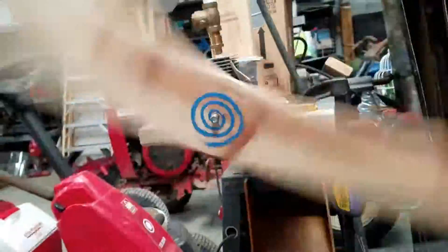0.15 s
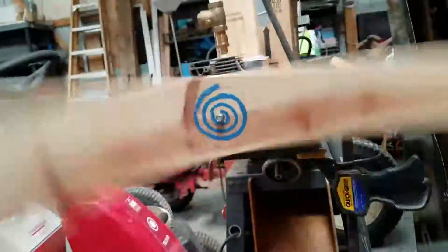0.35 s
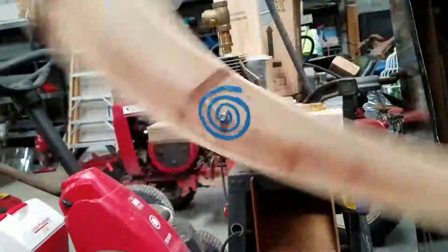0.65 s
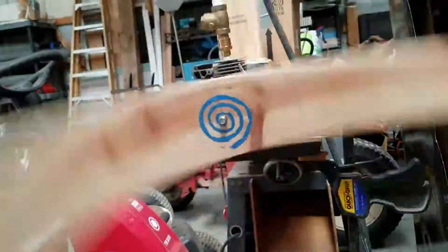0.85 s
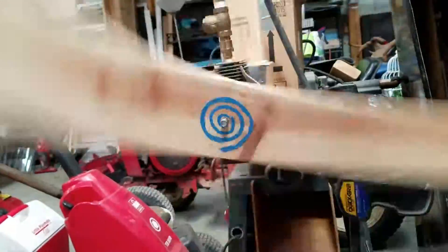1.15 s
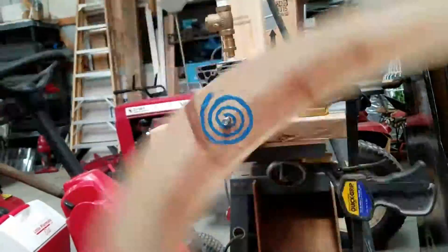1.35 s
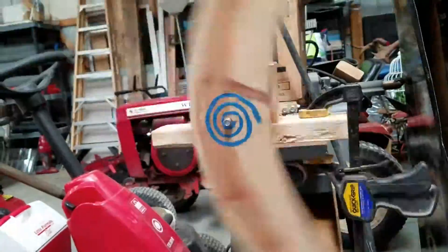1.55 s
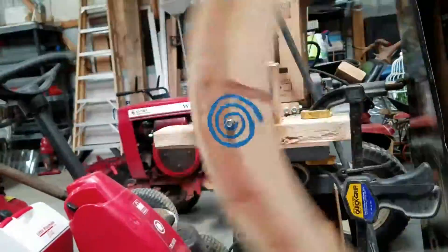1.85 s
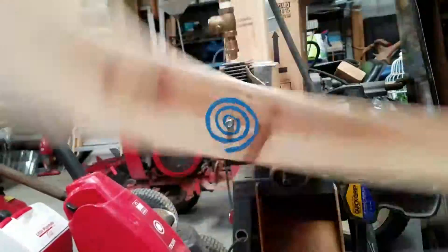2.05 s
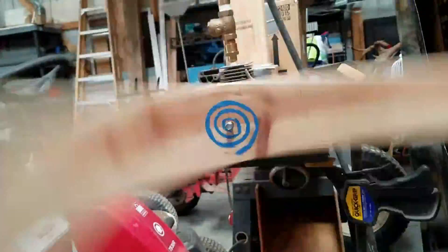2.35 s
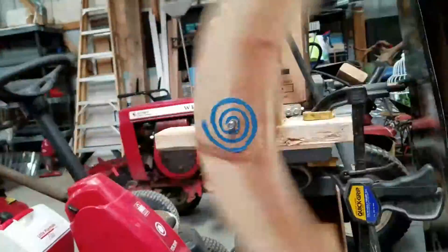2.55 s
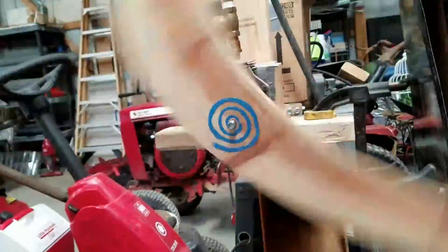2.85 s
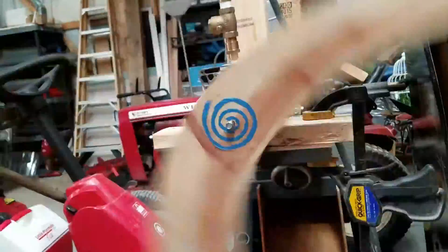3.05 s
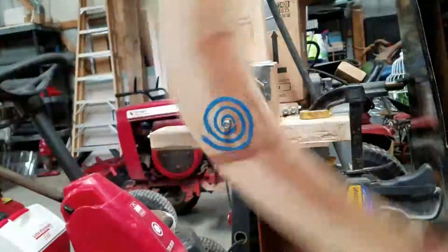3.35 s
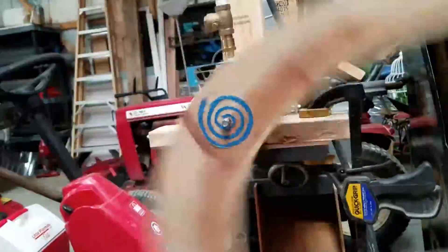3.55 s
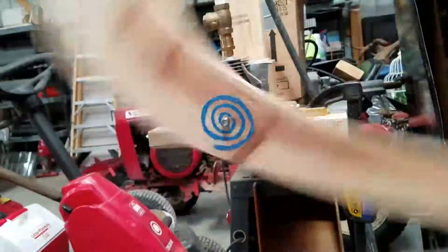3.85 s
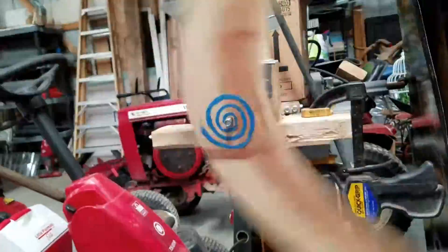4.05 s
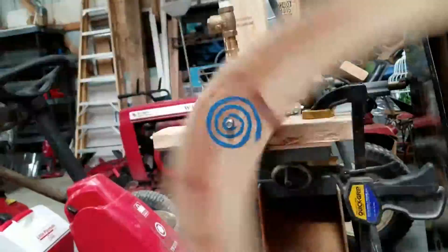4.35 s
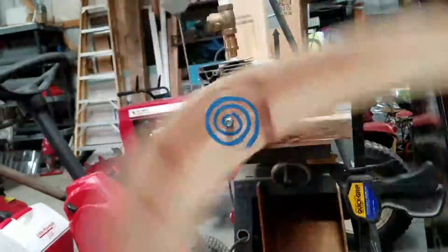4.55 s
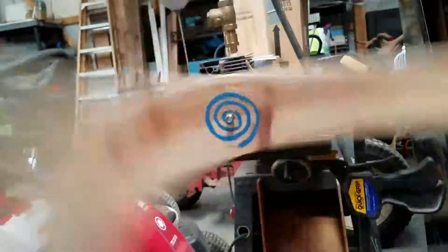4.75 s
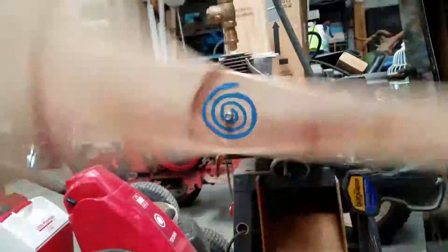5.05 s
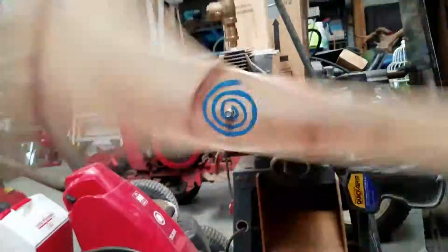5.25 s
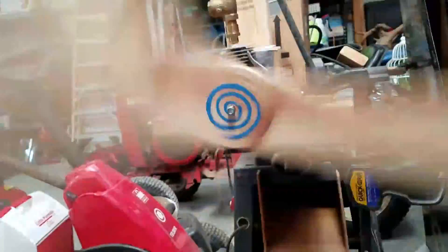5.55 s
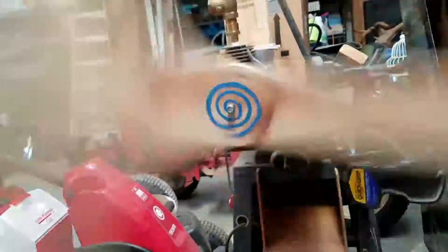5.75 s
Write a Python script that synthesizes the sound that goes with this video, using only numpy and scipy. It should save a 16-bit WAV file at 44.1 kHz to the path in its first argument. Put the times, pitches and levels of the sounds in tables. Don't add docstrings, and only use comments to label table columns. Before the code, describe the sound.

Rhythmic metallic clacks alternate with breathy compressed-air exhaust puffs, quickening from about three to five turns per second, the air finally dominating.

```python
import sys
import numpy as np
from scipy import signal
from scipy.fft import rfft, irfft, next_fast_len
from scipy.io import wavfile
from scipy.ndimage import uniform_filter1d, map_coordinates

SR = 44100
rng = np.random.default_rng(int(sys.argv[2]) if len(sys.argv) > 2 else 0)


def int16_out(signal):
    q = np.round(np.clip(np.atleast_2d(signal).T, -1, 1) * 32767)
    wavfile.write(sys.argv[1], SR, q.astype(np.int16))


def voltage_ratio(level):
    return 10 ** (np.asarray(level, float) / 20)


N = 260190
WIDE_OPEN_S = 3.55

# (time [s], peak level [dB], struck part [Hz], its level [dB])
VALVE_CLACKS = [(0.279, -18, 1585, -3), (0.614, -17.5, 1530, -14), (0.945, -14, 1600, -12),
                (1.265, -14, 1290, -20), (1.573, -14.5, 1530, -10), (1.872, -13, 1530, -29),
                (2.162, -15.5, 1490, -2), (2.443, -12.5, 1260, -22), (2.716, -12, 1302, -22),
                (2.98, -8.5, 1600, -24), (3.237, -9, 1290, 1), (3.486, -10, 1496, -5),
                (3.726, -18.5, 1483, -4), (3.961, -20.5, 1270, -15), (4.187, -19.5, 1500, -5.5),
                (4.406, -24, 1530, -18), (4.622, -23.5, 1496, 1), (4.832, -25, 1475, -1),
                (5.038, -25, 1530, -1), (5.241, -29.5, 1520, -7), (5.441, -22, 1483, 1),
                (5.637, -22.5, 1456, -6), (5.833, -22, 1480, -21)]
# (time [s], hiss level [dB], rise [s], slit whistle [Hz])
PORT_OPENINGS = [(0.0191, -20, 0.0021, 2470), (0.368, -17, 0.0025, 2335), (0.701, -15, 0.001, 2440),
                 (1.035, -16.5, 0.0032, 2560), (1.353, -18, 0.003, 2425), (1.6554, -15.5, 0.022, 3870),
                 (1.951, -14.5, 0.01, 2190), (2.241, -19.5, 0.003, 2200), (2.521, -22, 0.003, 2214),
                 (2.798, -13.5, 0.003, 2370), (3.052, -22, 0.0025, 2855), (3.308, -19.5, 0.003, 2840),
                 (3.556, -17, 0.0023, 3650), (3.799, -18, 0.0064, 2870), (4.031, -17.5, 0.0032, 2730),
                 (4.254, -18.5, 0.0038, 2760), (4.472, -21, 0.0039, 2250), (4.686, -19, 0.0041, 2850),
                 (4.897, -19.5, 0.0022, 2160), (5.101, -20.5, 0.0025, 2160), (5.305, -18, 0.003, 2675),
                 (5.5015, -19.5, 0.0041, 2350), (5.6967, -23, 0.0053, 2640), (5.894, -20, 0.0043, 3720)]
# (time [s], hiss level [dB], port resonance [dB], hold [s])
PORT_SURGES = [(0.042, -16.5, -4, 0.0087), (0.387, -16.5, -11, 0.0086), (0.7205, -16.5, -12, 0.011),
               (1.0485, -14.5, -12, .005), (1.365, -13, -20, .01), (1.669, -16, -5, .01),
               (1.966, -18.5, -11, .015), (2.252, -12.5, -5, 0.014), (2.529, -13.5, -5.5, 0.023),
               (2.804, -16, -17, 0.018), (3.063, -12.5, -9.5, 0.024), (3.317, -12, -2.5, 0.018),
               (3.563, -14, -8, 0.016)]
# (time [s], hiss level [dB], port resonance [dB], level of the flow that follows [dB], hold [s])
PORT_BLASTS = [(1.073, -16.5, -15, -37, .002), (1.394, -19, -12, -39, .002), (1.7, -17.5, -16, -34, .004),
               (1.9994, -26, -5, -44, .004), (2.285, -16.5, -5, -36, .002), (2.561, -15.5, -4, -28.5, .004),
               (2.826, -16.5, -13, -30.5, .002), (3.09, -17, -9, -28.5, .002),
               (3.348, -12, -16, -27.5, .002), (3.594, -7.5, -7.5, -16.5, .003),
               (3.83, -9, -4.5, -31, 0.0068), (4.0634, -8, -18, -19.5, .003),
               (4.285, -9.5, -4.5, -21.5, 0.004), (4.503, -10, -3, -25.5, 0.0034),
               (4.7176, -6, -2.5, -19, 0.0044), (4.925, -8, -10, -14.5, 0.0075),
               (5.131, -5, -6, -14.5, 0.0069), (5.3324, -6, -16, -15, 0.0084),
               (5.5307, -8.5, -9, -14, 0.013), (5.724, -8.5, -12, -20, 0.011)]
# (frequency [Hz], level [dB per Hz])
JET_SPECTRUM = [(290, -11), (500, -9.5), (1380, -7.5), (1550, -3), (1840, -9), (2260, -0.5), (4400, -5),
                (5390, -11), (6800, -7.5), (16000, -3)]


def unit(x):
    return x / np.sqrt(np.mean(x ** 2) + 1e-20)


def along(points, hz):
    f, v = np.transpose(points)
    return np.interp(np.log(hz + 1), np.log(f + 1), v)


def spectrum(points):
    return lambda hz: voltage_ratio(along(points, hz))


def filtered(x, response):
    m = next_fast_len(N + 8192)
    return irfft(rfft(x, m) * response(np.fft.rfftfreq(m, 1 / SR)), m)[..., :N]


def place(track, s, part):
    start_sample = round(s * SR)
    track[..., start_sample:start_sample + part.shape[-1]] += part


def decay(t, t60):
    return voltage_ratio(-60 * np.maximum(t, 0) / t60)


def swell(t, rise, t60, hold=0):
    shape = (1 - np.exp(-t / max(rise, 1e-4))) ** 2 * decay(t - hold, t60)
    return shape / shape.max()


def rush(gain, alike_share):
    # (frequency [Hz], left-right likeness [0-1])
    likeness = [(60, 1), (180, 1), (550, 0.9), (1650, 0.12), (4970, 0.23), (15000, 0.053)]

    def mid_and_side(hz):
        angle = np.arccos(np.clip(alike_share * along(likeness, hz), -1, 1)) / 2
        return gain(hz) * np.array([np.cos(angle), np.sin(angle)])

    mid, side = filtered(rng.standard_normal((2, N)), mid_and_side)
    return unit(np.array([mid + side, mid - side]))


def patchy(x, depth_db):
    z = signal.stft(x, nperseg=256)[2]
    field = uniform_filter1d(rng.standard_normal(z.shape[1:]), size=5, axis=0)
    field = uniform_filter1d(field, size=5, axis=1)
    return unit(signal.istft(z * voltage_ratio(depth_db * unit(field)), nperseg=256)[1][:, :N])


def shed_tail():
    # (frequency [Hz], t60 [s])
    shed_t60 = [(200, 0.31), (1000, 0.6), (4000, 0.4), (12000, 0.33)]
    hz, t, (a, b) = signal.stft(rng.standard_normal((2, SR // 3)), SR, nperseg=256)
    alike = 1 / (1 + (hz[:, None] / 700) ** 2)
    z = np.array([a, alike * a + np.sqrt(1 - alike ** 2) * b])
    tail = signal.istft(z * voltage_ratio(-60 * t / along(shed_t60, hz)[:, None]), SR, nperseg=256)[1]
    return np.pad(tail / np.linalg.norm(tail[0]), ((0, 0), (200, 0)))


def in_shed(x):
    return signal.fftconvolve(x, shed_tail(), axes=1)


def ring(modes, t, attack, hold, scatter_db, spread):
    hz, db, t60 = np.transpose(modes)[:, :, None]
    chance = rng.standard_normal((3, len(modes), 1))
    fade = voltage_ratio(db + scatter_db * chance[0]) * decay(t - hold, t60) * (1 - np.exp(-t / attack))
    phase = 2 * np.pi * hz * (1 + 0.004 * chance[1]) * t
    lead = spread * chance[2] * hz / 1000
    return np.array([(fade * np.sin(phase + side * lead)).sum(0) for side in (-.5, .5)])


def clatter(points, t, hold, t60):
    hz = np.fft.rfftfreq(len(t), 1 / SR)
    shared, left, right = rng.standard_normal((3, len(t)))
    z = rfft([0.7 * shared + 0.82 * left, 0.72 * shared + 0.83 * right]) * voltage_ratio(along(points, hz))
    high = 1 / (1 + (3500 / (hz + 1)) ** 4)
    size = np.std(irfft(z, len(t)))
    low_part = irfft(z * (1 - high), len(t)) * decay(t - hold, t60)
    first_crack = voltage_ratio(-3.5) * decay(t, 0.0078)
    high_part = irfft(z * high, len(t)) * (decay(t - 0.77 * hold, 0.41 * t60) + first_crack)
    return (low_part + high_part) / size * (1 - np.exp(-t / 0.00063))


def blows(events, body, bright, trim_db, hold, clatter_db, clatter_t60, wet_db, scatter_db, struck_t60):
    # (frequency [Hz], level [dB], t60 [s])
    board = [(88, 0, 0.14), (122, 3.5, 0.021), (162, 2, 0.073)]
    ringing_to_walls = 0.55
    out, t = np.zeros((2, N + SR)), np.arange(SR // 5) / SR
    for s, db, bright_db, thump_db, part_hz, part_db in events:
        metal = ring(body + [(part_hz, part_db, struck_t60)], t, 0.0011, hold, scatter_db, 0.99)
        rattle = voltage_ratio(bright_db + clatter_db) * clatter(bright, t, hold, clatter_t60)
        thump = voltage_ratio(thump_db + 3.0) * ring(board, t, 0.00061, 0, 3.0, 0.71)
        hit = voltage_ratio(wet_db) * in_shed(ringing_to_walls * metal + rattle + thump)
        hit[:, :len(t)] += metal + rattle + thump
        place(out, s, voltage_ratio(db + trim_db) * hit)
    return out[:, :N]


def cushion(s):
    return -5.5 * (s > WIDE_OPEN_S)


def wash():
    # (time [s], rumble level [dB], hose hiss level [dB])
    background = [(0.0, -44, -53), (0.71, -48.5, -56.5), (1.64, -47, -46.5), (2.86, -44.5, -48),
                  (3.5, -41.5, -39.5), (3.81, -48.5, -41.5), (4.5, -50.5, -39), (5.39, -48.5, -33),
                  (5.9, -51, -42)]
    # (frequency [Hz], level [dB per Hz])
    hum = [(15, -55), (25, -30), (113, 11), (331, 1), (790, -3.5), (1080, -5.5), (1190, -7), (1560, -9),
           (1840, -16), (2270, -10), (3500, -39), (4550, -40), (7700, -120)]
    # (frequency [Hz], level [dB per Hz])
    hose = [(1500, 2), (3000, 10), (4500, 3), (6000, 3), (9000, 0), (13600, -30), (16000, -9)]
    s, *cols = np.transpose(background)
    rumble_db, hose_db = (np.interp(np.arange(N) / SR, s, col) for col in cols)
    rumble = voltage_ratio(rumble_db + 1.5) * rush(spectrum(hum), 0.94)
    return rumble + voltage_ratio(hose_db - 7.0) * rush(spectrum(hose), 0.51)


def puffs():
    # (time [s], opening [0-1])
    supply = [
        (0, 0.24),
        (2.3, 0.28),
        (3.1, 0.23),
        (3.5, .98),
        (5.9, .9),
    ]
    blast_rise = 0.0018
    openings = []
    for s, db, rise, slit_hz in PORT_OPENINGS:
        t60 = 0.053 + 0.22 * np.interp(s, *np.transpose(supply))
        openings.append((s, db, -4, rise, t60, 0, slit_hz))
    gusts = [(s, db, port_db, 0.0015, 0.15, hold) for s, db, port_db, hold in PORT_SURGES]
    for s, db, port_db, follow_db, hold in PORT_BLASTS:
        gusts.append((s, db, port_db, blast_rise, 0.073, hold))
        gusts.append((s + 0.014, follow_db, -3, blast_rise, 0.31, 0))
    return openings, gusts


def resonances(peaks):
    def gain(f):
        total = 0
        for k, (centre, width_hz, db) in enumerate(peaks):
            peak = f * width_hz / (centre ** 2 - f ** 2 + 1j * f * width_hz)
            total = total + (-1) ** k * voltage_ratio(db) * peak
        return np.abs(total)
    return gain


def exhaust():
    seepage_db = [-5.5, -12, -5, -10, -7, -16, -16, -24, -16, -6, -15, -15, -15, -12, -10, -11, -11, -13,
                  -12, -13, -18, -20, -15, -14]
    # (frequency [Hz], width [Hz], level [dB])
    port_throttled = [(1600, 100, 1.5), (2270, 180, 0.5), (2800, 230, 1), (4180, 600, -2.5)]
    # (frequency [Hz], width [Hz], level [dB])
    port_fed = [(1570, 210, 0.5), (2250, 190, -2), (2680, 70, -1), (2870, 100, 1), (4950, 1800, -3.5)]
    jet_power, port_power, whistle = np.zeros((3, N + SR))
    t = np.arange(SR // 3) / SR
    openings, gusts = puffs()
    for (s, db, port_db, rise, t60, _, slit_hz), seep_db in zip(openings, seepage_db):
        place(jet_power, s - 0.01, voltage_ratio(2 * (db + seep_db)) * swell(t, 0.0039, 0.1) ** 2)
        phase = 2 * np.pi * slit_hz * (0.9 * t + 0.0764 * 0.02106 * (1 - np.exp(-t / 0.0203)))
        overtones = sum(voltage_ratio(-4 * k) * np.sin((k + 1) * phase) for k in range(4))
        place(whistle, s, voltage_ratio(db + port_db) * swell(t, rise, 0.41 * t60) * overtones)
    for s, db, port_db, rise, t60, hold, *_ in openings + gusts:
        gust_power = swell(t, rise, t60, hold) ** 2
        place(jet_power, s - 0.003, voltage_ratio(2 * db) * gust_power)
        place(port_power, s - 0.003, voltage_ratio(2 * (db + port_db)) * gust_power)
    flutter = voltage_ratio(1.4 * map_coordinates(rng.standard_normal(N // 100 + 4), [np.arange(N) / 100]))
    throttled = np.arange(N) / SR < WIDE_OPEN_S
    throat = np.where(throttled, rush(resonances(port_throttled), .95), rush(resonances(port_fed), 0.84))
    hiss = voltage_ratio(-6) * np.sqrt(jet_power[:N]) * patchy(rush(spectrum(JET_SPECTRUM), 0.95), depth_db=2.5)
    hoarse = voltage_ratio(-13.5) * whistle[:N] * rush(lambda hz: 1 / (1 + (hz / 250) ** 2), 0.93)
    resonant = voltage_ratio(-9.0) * np.sqrt(port_power[:N]) * patchy(throat, depth_db=5.0)
    air = flutter * (hiss + hoarse + resonant)
    return air + voltage_ratio(-10.5) * in_shed(air)[:, :N]


def rod():
    # (time [s], peak level [dB], bright part [dB])
    cams = [(0.02, -25.5, -4), (0.363, -23.5, -6), (0.698, -23, -18), (1.026, -26, -8), (1.342, -32, -13.5),
            (1.648, -30, -10), (1.944, -25, -14), (2.232, -22.5, -9), (2.512, -24, -21), (2.782, -22.5, -7),
            (3.043, -31, -6), (3.299, -24, -12), (3.547, -20.5, -11), (3.786, -21.5, -21), (4.017, -24, -9),
            (4.241, -36, -10), (4.46, -35, -10), (4.674, -37, -7), (4.883, -33, 0), (5.088, -29, -10),
            (5.29, -31, -2), (5.489, -32, -8), (5.685, -42, -10), (5.881, -25.5, -10)]
    # (time [s], peak level [dB], bright part [dB])
    knocks = [(0.087, -30.5, 7.5), (0.428, -31.5, 5), (0.761, -30.5, 5), (1.089, -32, 5),
              (1.404, -19.5, -3.5), (1.708, -24.5, -0.5), (2.001, -22, 3.5), (2.287, -18, -4),
              (2.566, -15.5, -11), (2.833, -18, -1), (3.095, -14, -6), (3.349, -15, -10),
              (3.594, -12.5, 1.5), (3.831, -16.5, 3.5), (4.062, -16, 0), (4.285, -20, -4),
              (4.503, -24.5, 2), (4.715, -29, -10), (4.926, -32, -3), (5.136, -19.5, 3), (5.33, -21, 5),
              (5.529, -22, 3), (5.725, -27, 2), (5.917, -25, 1)]
    # (frequency [Hz], level [dB], t60 [s])
    rod_modes = [(615, -8.5, 0.048), (741, -2, 0.031), (813, -3.5, 0.07), (857, -3, 0.082),
                 (1069, -6, 0.025), (1300, -11.5, .03), (2250, -9, 0.083)]
    # (frequency [Hz], level [dB per Hz])
    rod_bright = [(400, -9), (800, -8), (1500, -3), (2300, -5), (2800, -0.5), (4000, -23), (8000, -16.5),
                  (16000, -5.5)]
    events = [(s, db, bright_db, -21.5, 2100, -12) for s, db, bright_db in cams]
    events += [(s, db, bright_db, -34 + cushion(s) - db, 1058, -2) for s, db, bright_db in knocks]
    return blows(events, rod_modes, rod_bright, trim_db=-5.5, hold=0.0028, clatter_db=0.0,
                 clatter_t60=0.11, wet_db=-8, scatter_db=1.5, struck_t60=.03)


def pings():
    # (time [s], peak level [dB], frequency [Hz], t60 [s])
    housing_parts = [(.024, -29.5, 2310, 0.091), (.045, -34, 2500, .03), (.099, -37, 2040, 0.08),
                     (.155, -38, 2310, 0.042), (0.281, -28, 1280, .05), (.368, -33, 4270, .03),
                     (0.385, -27, 2970, .025), (.704, -26, 2380, 0.056), (.829, -40, 2260, 0.047),
                     (1.045, -19, 2335, 0.021), (1.62, -27, 1530, 0.033), (1.671, -16, 3900, .04),
                     (1.678, -33, 2250, 0.055), (2.568, -23, 2800, .03), (3.836, -23, 2470, .04),
                     (4.505, -22, 2800, 0.044), (4.896, -30, 1600, .07), (4.928, -26, 2700, .04),
                     (4.935, -26, 742, 0.15), (4.943, -19, 1517, 0.055), (4.944, -14, 2750, 0.03),
                     (5.135, -28, 2870, 0.051), (5.151, -19, 2870, 0.04), (5.19, -30, 1050, 0.048),
                     (5.35, -17, 2935, 0.061), (5.506, -28, 1630, .06), (5.535, -21, 2740, 0.027),
                     (5.553, -17.5, 2770, 0.053), (5.701, -31, 1630, .06), (5.725, -29.5, 740, .12),
                     (5.73, -27, 2590, .04), (.022, -26, 4200, 0.028), (.388, -31, 6030, .04),
                     (.39, -29, 5000, .02), (.945, -33, 1064, 0.12), (1.026, -33, 860, 0.022),
                     (1.088, -29, 813, 0.023), (1.265, -23.5, 1068, .09), (1.873, -21.5, 1059, 0.074),
                     (1.944, -33, 850, 0.022), (2.512, -31, 860, 0.022), (3.095, -36, 867, .1),
                     (3.299, -31, 850, 0.021), (3.348, -24.5, 858, 0.12), (4.883, -34, 920, .03),
                     (5.089, -30.5, 950, 0.027), (5.29, -36, 870, 0.02)]
    out, t = np.zeros((2, N + SR)), np.arange(SR // 5) / SR
    for s, db, hz, t60 in housing_parts:
        place(out, s, ring([(hz, db, t60)], t, 0.0012, 0.0033, 0, 0.67))
    return out[:, :N] + voltage_ratio(-14.5) * in_shed(out[:, :N])[:, :N]


def crackle():
    flow, t = np.zeros(N + SR), np.arange(SR // 100) / SR
    for s, db, *_ in PORT_SURGES + PORT_BLASTS:
        for late, size in rng.random((6, 2)):
            spit_db = db - 13.5 - 8.6 * late + 8.1 * size
            place(flow, s + 0.04 * late ** 2, voltage_ratio(spit_db) * decay(t, 0.005))
    return flow[:N] * rush(spectrum(JET_SPECTRUM), .9)


def linkage():
    # (time [s], peak level [dB], bright part [dB])
    returns = [(.154, -29.5, -2), (.494, -33.5, 5), (.826, -31, -2), (1.149, -34, 8), (1.462, -33, 5),
               (1.767, -43, 0), (2.058, -31, 1), (2.343, -29.5, -6), (2.62, -27, 6), (2.886, -36, 3),
               (3.14, -29, -10), (3.398, -31, -12)]
    # (time [s], peak level [dB], bright part [dB], struck part
    # [Hz])
    rattles = [(1.299, -30, 3, 2300), (1.614, -28, -7, 1560), (0.31, -44, -4, 1500), (2.195, -33, -8, 1520),
               (3.27, -22.5, -5, 1300), (3.61, -21, 5, 860), (4.945, -21, 1, 1300), (5.144, -30, 19, 860),
               (5.151, -15.5, -9, 1050), (5.157, -21, -15, 1100), (5.344, -21, 8, 850),
               (5.351, -21, 8.5, 950), (5.358, -19, -9, 824), (5.552, -21, 3, 1110), (5.561, -17.5, 2, 840),
               (5.743, -25, -2, 1700),
               (0.295, -35, -10, 1500), (0.631, -37, -5, 1300), (0.963, -30, -3, 1510),
               (1.155, -33, 6.5, 2250), (1.282, -33, -5, 1300), (1.591, -29, -3, 1500),
               (1.887, -30, -4, 1300), (2.179, -35, -5, 1530), (2.468, -31, -11, 1300),
               (2.748, -31, -4, 1300), (2.999, -27, -9, 1470), (3.02, -27, -3, 1300),
               (3.262, -29, -12, 1400), (3.504, -31, -8, 1300), (4.416, -31, -10, 1070),
               (4.509, -20.5, 4, 1600), (4.722, -30, -9, 1570)]
    # (frequency [Hz], level [dB], t60 [s])
    link_modes = [(612, -12.5, 0.081), (740, -6.5, 0.075), (850, -11, 0.1), (1064, 4, 0.027),
                  (1290, -0.5, 0.041), (1850, -9, 0.0079), (2274, -10, 0.042)]
    # (frequency [Hz], level [dB per Hz])
    link_bright = [(400, -2), (800, -15), (1500, 3), (2300, 9), (2800, 5), (4000, -33), (8000, -15),
                   (16000, -10)]
    events = [(s, db, bright_db, -15, 1080, -0.9) for s, db, bright_db in returns]
    events += [(s, db, bright_db, -22, hz, 1.5) for s, db, bright_db, hz in rattles]
    return blows(events, link_modes, link_bright, trim_db=-6.5, hold=0.0017, clatter_db=-2.5,
                 clatter_t60=0.033, wet_db=-5.0, scatter_db=4.5, struck_t60=.024)


def crank(share):
    s = np.array([row[0] for row in VALVE_CLACKS])
    first_turn, last_turn = 0.33, 0.18
    turn_edges = np.concatenate([[s[0] - first_turn], s, [s[-1] + last_turn]])
    return turn_edges[:-1] + share * np.diff(turn_edges)


def inlet():
    # (frequency [Hz], level [dB per Hz])
    leak = [(4000, -45), (8000, -15), (11000, -3), (14000, 6), (16000, -5)]
    flow, t = np.zeros(N + SR), np.arange(SR // 5) / SR
    moments = crank(0.846)
    for s in moments[moments < WIDE_OPEN_S]:
        db = -29 + 0.7 * s
        place(flow, s - 0.004, voltage_ratio(db - 11.5) * swell(t, 0.0057, 0.22, hold=0.026))
    return flow[:N] * rush(spectrum(leak), .8)


def valve():
    # (frequency [Hz], level [dB], t60 [s])
    valve_modes = [(397, -22.5, 0.25), (512, -18, 0.12), (618, -12, 0.098), (869, -14, 0.21),
                   (944, -12, 0.14), (1065, 0, 0.07), (1156, -12.5, 0.092), (1530, -12.5, 0.049)]
    # (frequency [Hz], level [dB per Hz])
    valve_bright = [(350, -24), (600, -5.5), (1000, -7), (1400, -3.5), (1780, -5.5), (2340, -2),
                    (3500, -13.5), (5660, -22), (8430, -28), (12700, -29), (16000, -22.5)]
    events = []
    for s, db, hz, part_db in VALVE_CLACKS:
        bright_db = -6 - 0.29 * (db + 17.0)
        thump_db = -39.5 + cushion(s) - db
        events.append((s, db, bright_db, thump_db, hz, part_db))
    return blows(events, valve_modes, valve_bright, trim_db=-5.0, hold=0.0067, clatter_db=1,
                 clatter_t60=0.048, wet_db=-10.0, scatter_db=1.0, struck_t60=0.051)


def spits():
    spits_db = [-35, -34.5, -32, -35, -40, -26, -33, -37, -40, -40, -52, -33, -36, -42, -38, -42, -48, -46,
                -46, -46, -44, -46, -44]
    # (frequency [Hz], level [dB per Hz])
    spit_spectrum = [(3000, -32), (6000, -8), (9000, -1), (14000, 2), (16000, -2.5)]
    flow, t = np.zeros(N + SR), np.arange(SR // 5) / SR
    for (s, *_), db in zip(VALVE_CLACKS, spits_db):
        place(flow, s, voltage_ratio(db) * swell(t, 0.00051, 0.025, hold=0.0015))
    creep_lead = 0.073
    for s, *_ in PORT_OPENINGS[1:]:
        place(flow, s - creep_lead, voltage_ratio(-49.5) * swell(t, .03, 0.1, hold=creep_lead))
    return flow[:N] * rush(spectrum(spit_spectrum), .85)


def spring():
    # (frequency [Hz], level [dB], t60 [s])
    spring_modes = [(676, -24, 0.14), (1306, -17.5, 0.053), (1472, -22, .16), (1570, -20.5, 0.097),
                    (1708, -29, 0.077), (2243, -17.5, 0.022)]
    uptake_db = [4, -7, -3, 1, 0, -2, 4, -6, -3, -4, -4, 2, 0, 0, 0, 3, 0, 3, 3, 0, 2, 0, -1]
    out, t = np.zeros((2, N + SR)), np.arange(SR // 5) / SR
    for (s, db, *_), share_db in zip(VALVE_CLACKS, uptake_db):
        place(out, s + 0.007, voltage_ratio(db + share_db) * ring(spring_modes, t, 0.0056, 0.0044, 4.7, 0.83))
    return out[:, :N]


def scene():
    air = wash() + exhaust() + crackle() + inlet() + spits()
    return air + rod() + pings() + linkage() + valve() + spring()


def low_pass(x):
    return signal.sosfilt(signal.butter(12, 17030, fs=SR, output="sos"), x)


def record(dry):
    # (frequency [Hz], left minus right [dB])
    tilt = [(60, -1.5), (180, -1), (550, -1), (1650, 2.5), (4970, 4), (9000, 5), (15000, 1)]
    ports = filtered(dry, lambda hz: voltage_ratio(along(tilt, hz) * np.array([[.5], [-.5]])))
    ports = ports / (1 + np.abs(ports / .75) ** 4) ** (1 / 4)
    ports = ports + voltage_ratio(-57.0) * rng.standard_normal(ports.shape)
    treble_cut = lambda hz: np.clip(voltage_ratio(-.3 * (hz - 15800)), voltage_ratio(-120), 1)
    ports = filtered(ports, lambda hz: treble_cut(hz) / np.sqrt(1 + (50 / (hz + 1)) ** 6))
    return low_pass(ports)


dry = scene()
out = record(dry)
int16_out(out)
```